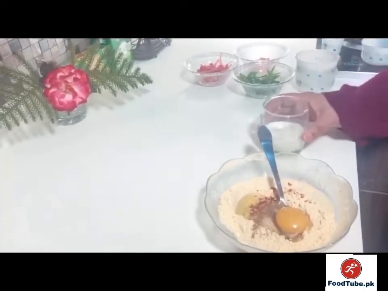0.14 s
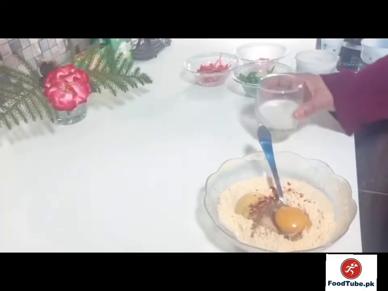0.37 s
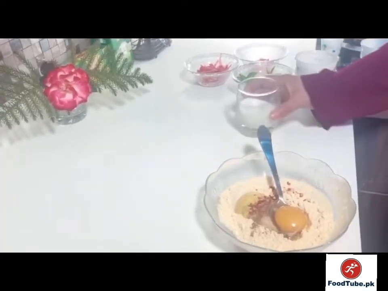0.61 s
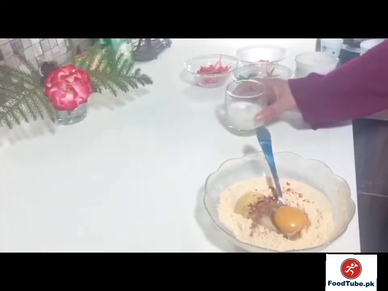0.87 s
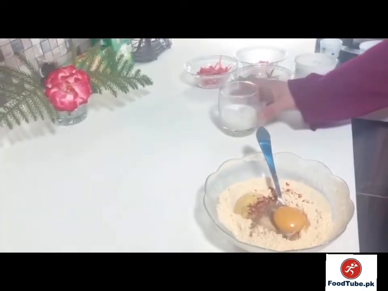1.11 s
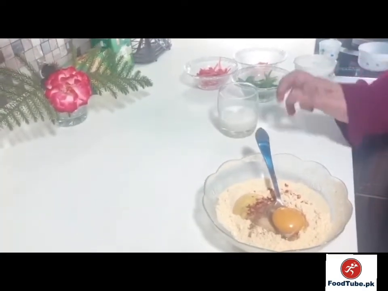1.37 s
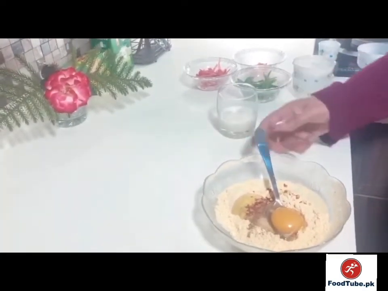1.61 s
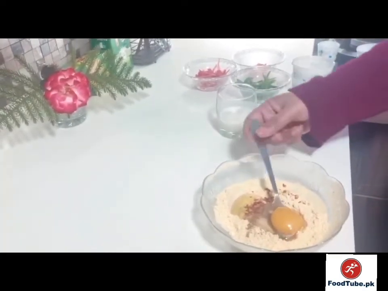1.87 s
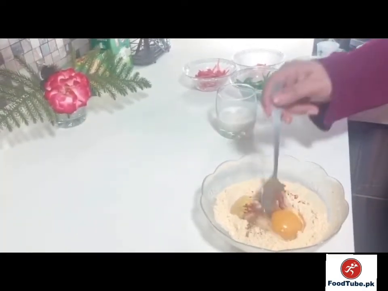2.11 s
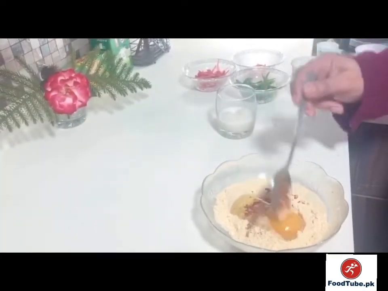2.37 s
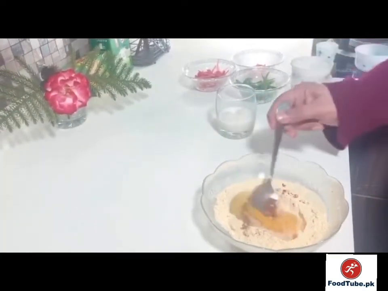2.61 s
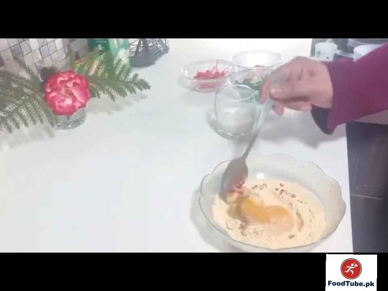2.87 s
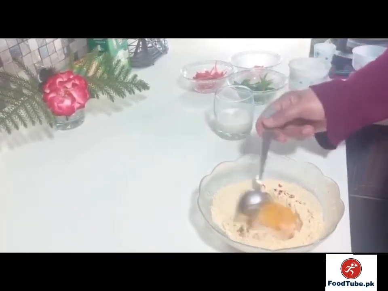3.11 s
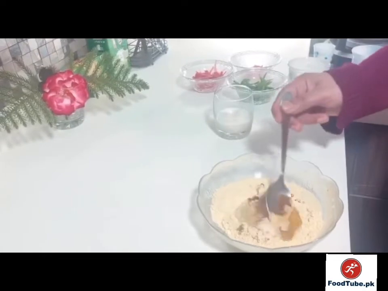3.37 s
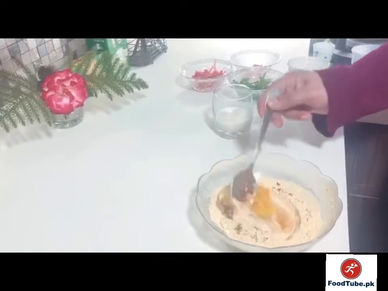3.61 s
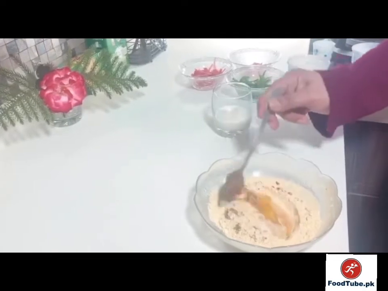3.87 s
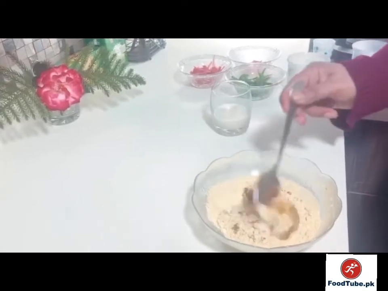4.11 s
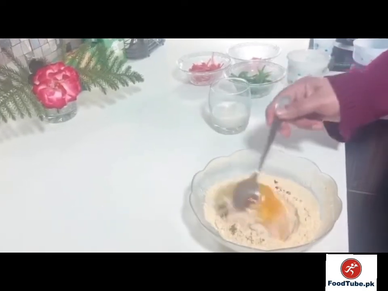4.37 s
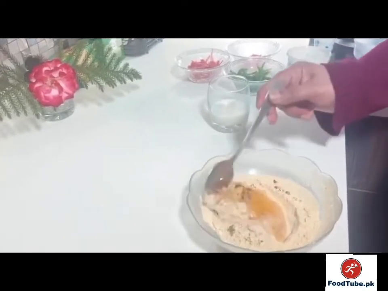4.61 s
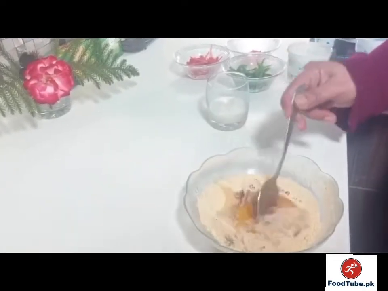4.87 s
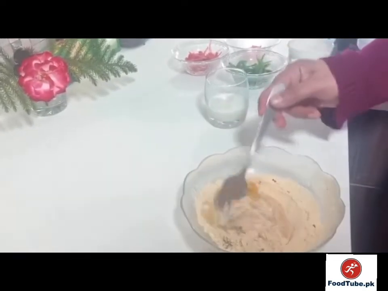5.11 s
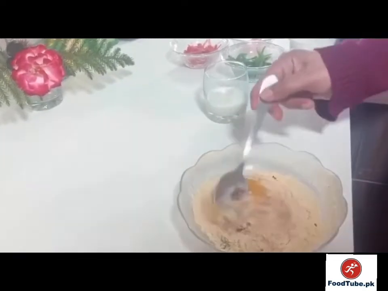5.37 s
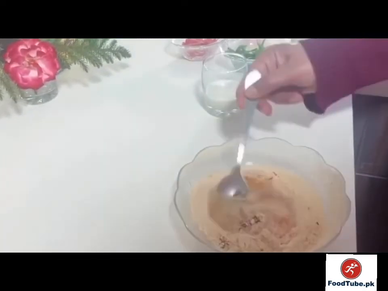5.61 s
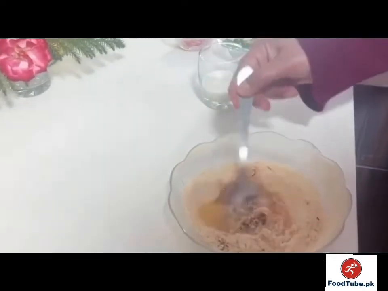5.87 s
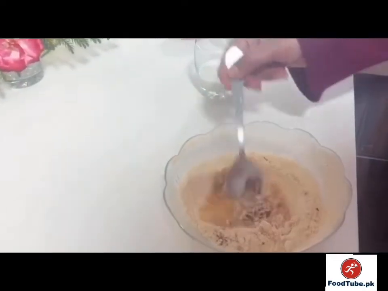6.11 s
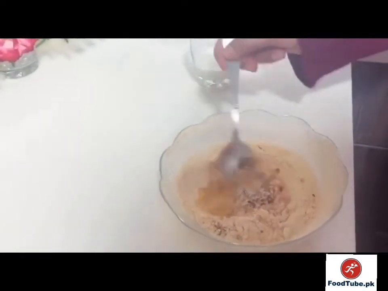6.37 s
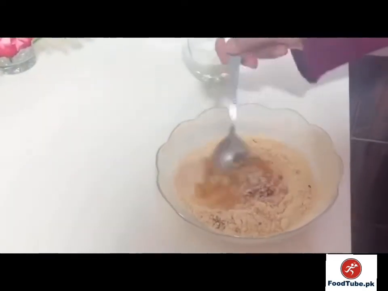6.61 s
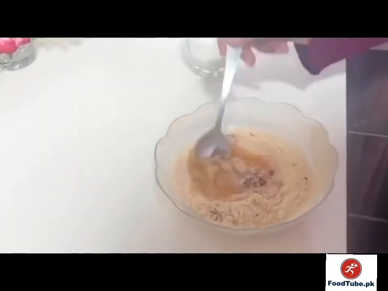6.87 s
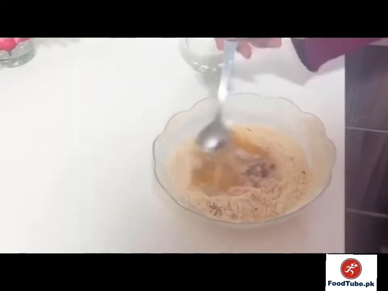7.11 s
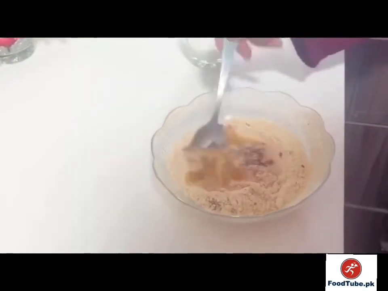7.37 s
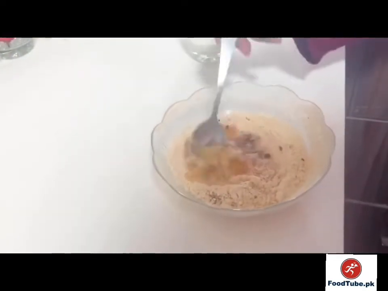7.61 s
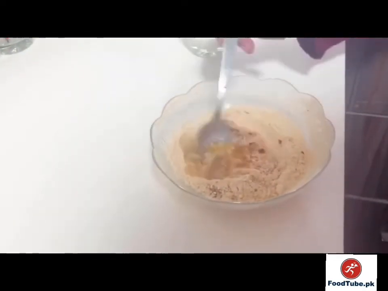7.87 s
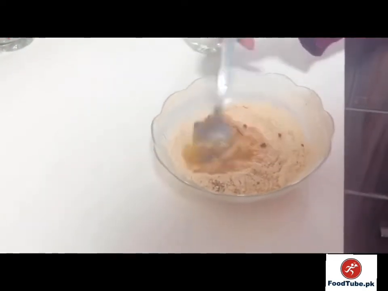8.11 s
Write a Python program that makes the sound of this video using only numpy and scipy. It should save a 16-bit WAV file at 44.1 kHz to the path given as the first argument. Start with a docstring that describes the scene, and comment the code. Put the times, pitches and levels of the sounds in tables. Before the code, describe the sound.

A small, moderately live kitchen heard closely, with low lumpy hum and faint hiss. At about 0.54 s a drinking glass base knocks hard on the counter, followed by small rattles around 0.7 s. At 0.9 s it clinks brightly against another glass and lands in a tight cluster of knocks by 0.98 s, leaving a short beating ring. From 1.8 s a metal spoon works in a glass bowl of thick batter, far quieter: dull damped taps and brief gritty scrapes at 2.4, 2.7, 3.4, 3.6 and 4.5 s, with soft swishes, sticky ticks and tiny squeaks. Thin distant tones swell around 2 to 3.6 s, then vanish. From 5.4 s strokes settle to one every 0.2 s or so. Sound drops out completely from 6.24 to 6.39 s. Taps grow clearer and louder from 7.16 s, continuing to the end at 8.2 s.

```python
"""Kitchen counter: a drinking glass is set down and clinks against its neighbour; then a metal spoon
stirs thick batter, tapping, scraping and squeaking on a glass bowl. Blows ring decaying modes, drags
drive them with noisy slips, batter is bell-shaped noise bands, and the room answers with dying noise.
Behind: a low hum with hiss and faint far tones. The sound drops out for a moment."""
import sys
import numpy as np
from scipy import signal
from scipy.fft import rfft, irfft, next_fast_len
from scipy.io import wavfile
from scipy.ndimage import uniform_filter1d

SR = 44100
rng = np.random.default_rng(int(sys.argv[2]) if len(sys.argv) > 2 else 0)


def dump_mix(stems):
    """Bounce the given channels to the path in sys.argv[1] as a 16-bit WAV at rate SR."""
    frames = np.atleast_2d(stems).T  # one column per channel
    limited = np.clip(frames, -1, 1)  # hard clip at full scale
    pcm = np.round(limited * 32767).astype(np.int16)
    wavfile.write(sys.argv[1], SR, pcm)


def voltage_ratio(decibels):
    """Convert decibels (scalar or array-like) to amplitude ratios, 20 dB per decade."""
    exponent = np.asarray(decibels, float) / 20
    return 10 ** exponent


N = 363384  # samples

# Glass base meeting the counter: [t/s, peak level/dB]
KNOCK_EVENTS = [(0.537, -13.5), (0.555, -22.5), (0.571, -33), (0.585, -28), (0.684, -32.5), (0.695, -35),
                (0.721, -31), (0.728, -27.5), (0.732, -22), (0.749, -25), (0.828, -32.5), (0.905, -34),
                (0.945, -14), (0.955, -17.5), (0.949, -20), (0.968, -17.5), (0.972, -18), (0.979, -18.5)]
# Counter modes: [f/Hz, relative level/dB, t60/s]
COUNTER_MODES = [(242.4, -10.5, 0.024), (452, -10.5, 0.047), (691, -1.5, 0.076), (932, 0, 0.044),
                 (1167, -2.5, 0.074), (1328, 3.5, 0.0434), (1540, -2.5, 0.048), (1837, -3, 0.028),
                 (2203, -5.5, 0.022), (2636, -13, 0.054), (3190, -19.5, 0.032), (4300, -21, 0.021),
                 (5960, -32.5, 0.036), (9000, -42.5, 0.019), (13700, -45, .012)]
# Counter slab, low modes: [f/Hz, relative level/dB, t60/s]
SLAB_MODES = [(74, -10.5, 0.35), (90.4, -2.5, 0.22), (135, -4.5, 0.12), (169.3, -3.5, 0.161),
              (312, -8.5, 0.079)]
# Glass struck: [t/s, peak level/dB, brightness/(dB/octave)]
CLINK_EVENTS = [(0.904, -18, -4.5), (0.909, -32, 10.5), (0.944, -42.5, 5.5)]
# Drinking glass modes: [f/Hz, relative level/dB, t60/s]
GLASS_MODES = [(1780, -12, .08), (4574, -5, .13), (4633, -4, .13), (4579, -21, .7), (4642, -21, .55),
               (7442, -1, .13), (950, -14, .04), (1200, -22, .04), (1925, -9, .04), (2195, -9, .05),
               (2400, -12, .045), (2570, -11, .04), (3050, -13, .04), (4436, -8, .08), (4720, -10, .06),
               (5000, -16, .1), (5610, -21, .06), (6260, -19, .05), (8690, -21, .15), (8830, -21, .15),
               (9520, -18, .08), (10340, -13, .12), (10690, -9, .07), (12380, -21, .07), (12680, -20, .16),
               (14450, -30, .15), (15530, -34, .08)]
# Glassware struck earlier, mean levels: [f/Hz, level/dB, t60/s]
FADING_MODES = [(3032, -73, 0.99), (3040, -76, 0.8), (3400, -76, 0.5)]
# Glasses touching lightly, mean levels: [t/s, f/Hz, level/dB, t60/s]
TINKLE_EVENTS = [(0.806, 9100, -72, 0.117), (0.834, 6000, -63.5, 0.072), (0.843, 2440, -54.5, .12)]
# Close pair of glass rim modes that beat: [f/Hz, initial rms level/dB, t60/s]
RIM_MODES = [(1775.5, -33, .58), (1784.6, -33.5, .58)]
# Bowl body, damped by batter: [f/Hz, relative level/dB, t60/s]
BOWL_BODY_MODES = [(316.2, -1, 0.049), (462.4, 5, 0.065), (570, -4, 0.065), (674, -6, 0.087),
                   (1070, -4.5, 0.097), (1442, -5.5, 0.026), (1660, -5.5, 0.05), (1863, -7, 0.043),
                   (2030, -14, 0.056), (2540, -12, 0.036), (2920, -8, 0.019), (3460, -11, 0.017),
                   (3840, -11, .015), (4530, -13, 0.014), (5020, -20.5, 0.024), (6604, -25, 0.018)]
# Thin bowl wall, damped by batter: [f/Hz, relative level/dB, t60/s]
BOWL_WALL_MODES = [(7170, -4.5, 0.014), (8400, -9.5, 0.11), (9070, 11, 0.0078), (10220, 7, 0.019),
                   (10960, -5, 0.048), (10860, 2.5, 0.024), (10300, -5, 0.0093), (12500, -8, 0.02),
                   (13250, 1, 0.018), (13400, -9, 0.0114), (15500, -0.5, 0.0066)]
# Spoon tip hits; wall near 0 = edge-on, low = flat:
# [t/s, body level/dB, wall level re body/dB, body brightness/(dB/octave)]
TAP_EVENTS = [(1.795, -41.5, -23, 2.5), (2.739, -49, -18, 1), (3.39, -48.5, -25, -9.5),
              (3.641, -43.5, -14, -.9), (4.458, -41.5, -7, -1), (4.474, -37.5, -11.5, -1.5),
              (5.384, -41.5, -26, -3.2), (5.595, -38, -24, -1), (5.624, -35.5, -34, -1.7),
              (5.642, -34, -33.5, -8), (5.792, -38.5, -4.5, -3), (5.832, -35.5, -30.5, 0.2),
              (6.202, -39.5, -12, 1.5), (6.432, -51, -10, -3), (6.452, -41, -22, -3.8),
              (6.662, -40.5, -16, -7), (6.686, -39, -34.5, -3.3), (6.916, -44.5, -10, 1.5),
              (6.939, -38.5, -27, -5), (7.159, -28.5, -22.5, 2.5), (7.377, -32.5, -23, 1),
              (7.607, -34, -22, -0.6), (7.829, -32, -18, 3.5), (7.835, -39.5, -5, -0.5),
              (8.062, -35.5, -11, 4)]
# Spoon drags: [t/s, length/s, body level/dB, wall level re body/dB, body brightness/(dB/octave)]
SCRAPE_EVENTS = [(1.762, 0.043, -53, -9, 3.5), (2.445, 0.0374, -57, -22, 2.5),
                 (2.731, 0.044, -57.5, -6, 1.5), (2.774, 0.055, -53.5, -4.5, 5.5),
                 (3.637, 0.068, -54, -8, 2.5), (4.444, 0.069, -47, -12, -1.5),
                 (4.592, 0.034, -71.5, 3.5, 12), (5.163, 0.055, -60.5, -3, 3), (5.376, 0.054, -56, 0.8, 4),
                 (5.589, 0.038, -49, -3.5, 6.5), (5.782, 0.033, -49.5, -3, 5.5),
                 (5.959, 0.081, -61.5, -9, 2), (6.186, 0.052, -55, -5, 5.5), (6.428, 0.048, -53, -20, -1.5),
                 (6.655, 0.02, -52, -1, 6), (6.913, 0.031, -49, -13.5, 1.6), (7.16, 0.021, -43.5, -23, 0),
                 (7.369, 0.038, -52, -18, -1), (7.606, 0.029, -43, -21.5, -1.8),
                 (7.834, 0.028, -45.5, -5, 5), (8.059, 0.037, -48, -13.5, 2)]
# Spoon edge singing: [t/s, length/s, peak rms level/dB, start f/Hz, end f/Hz]
SQUEAK_EVENTS = [(2.456, 0.059, -69, 1980, 2180), (2.784, 0.072, -70, 4320, 4530),
                 (3.67, 0.064, -70, 3400, 3450), (3.765, 0.11, -71, 2620, 2800),
                 (3.78, 0.086, -72, 5900, 6440), (4.452, .06, -65, 2400, 2560),
                 (6.685, .105, -59, 1000, 1580), (6.719, .05, -71, 2190, 2500),
                 (6.838, 0.045, -66, 1000, 1300), (7.829, 0.058, -54, 1710, 1750)]
# Batter round the spoon, glass over the counter: [middle t/s, length/s, peak rms level/dB, centre f/Hz]
SWISH_EVENTS = [(0.751, 0.23, -63.5, 2860), (2.352, 0.091, -70.5, 3800), (2.41, 0.23, -73, 7900),
                (2.91, 0.035, -71, 4010), (3.55, .2, -75.5, 9980), (3.815, 0.21, -68, 5470),
                (4.306, 0.71, -74, 4890), (6.045, 0.36, -84, 2490), (6.759, 0.42, -64, 3920),
                (7.711, 0.12, -73, 5000), (7.917, 0.099, -81, 9000), (8.124, 0.058, -69.5, 6970)]
# Short ticks, mostly batter letting go: [t/s, peak level/dB, centre f/Hz]
SMACK_EVENTS = [(2.334, -60.5, 3230), (2.356, -58, 3190), (3.833, -58, 3200), (4.5, -48, 9990),
                (4.9556, -64, 8700), (5.5022, -60, 9300), (0.719, -51, 3150), (6.8421, -55, 2000),
                (7.215, -59.5, 9000), (7.297, -54, 8260), (7.446, -52, 3300), (7.6929, -58.5, 4990)]
# Kitchen reverberation: [f/Hz, t60/s]
KITCHEN_DECAY = [(80, 0.3), (250, 0.29), (600, 0.715), (1500, 0.7), (3000, 0.462), (4600, 0.33),
                 (10000, 0.279)]
# Room tone spectrum: [f/Hz, relative density level/dB]
ROOM_SPECTRUM = [(12, -38.5), (22, -13), (45, -9.5), (107, -6.5), (146, -4), (168, -10.5), (187, -27.5),
                 (228, -13), (328, -15), (558, -22), (949, -23), (1260, -23), (1440, -26.5), (3840, -36),
                 (14300, -41.5), (16000, -66.5)]
# Room tone drift: [t/s, hum level/dB]
HUM_LEVEL = [(0, -60.5), (0.451, -58.5), (1.4, -56), (2.5, -56.5), (5.2, -56), (7., -55), (8.24, -55.5)]
# Far steady tones before the swell: [f/Hz, rms level/dB]
WHINE_TONES = [(807.5, -76.5), (963.6, -75.5), (1071, -77), (1443, -77.5), (1626, -81), (1755, -88),
               (2218, -93), (2422, -82.5)]
# Swell of the far tones: [t/s, gain/dB]
WHINE_GAIN = [(1.7, -31), (2., -5), (2.7, -2), (3.3, 0), (3.7, -30)]
# Silent span: (start t/s, end t/s)
SILENCE_S = (6.2435, 6.3865)

GRIP_WAVER_DB = 2.6


def evened(x):
    """Scales to rms 1."""
    return x / np.sqrt(np.mean(x ** 2) + 1e-20)


def peaked(x):
    """Scales so that the loudest few milliseconds peak near 1."""
    return x / np.sqrt(2 * uniform_filter1d(x ** 2, size=200).max())


def read(points, hz):
    """Interpolates a table on a log-frequency axis."""
    f, value = np.transpose(points)
    return np.interp(np.log(hz + 1), np.log(f + 1), value)


def add(mix, s, sound):
    """Adds a sound at time s."""
    part = mix[round(s * SR):][:len(sound)]
    part += sound[:len(part)]


def broad(length, hz, octaves):
    """Noise of rms 1 in a bell on a log-frequency axis."""
    f = np.fft.rfftfreq(length, 1 / SR) + 1
    bell = np.exp(-.5 * (np.log2(f / hz) / octaves) ** 2)
    return evened(irfft(rfft(rng.standard_normal(length)) * bell, length))


def ring(modes, tilt_db=0., rise_s=0.0003, seconds=0.27, spot_db=2, waver_db=0., loose=1):
    """Modes dying after a blow of finite length; chance of spot weights them, a shifting grip wavers them."""
    hz, db, t60 = np.transpose(modes)[:, :, None]
    t = np.arange(round(seconds * SR)) / SR
    chance = rng.standard_normal(hz.shape)
    phase = loose * 2 * np.pi * rng.random(hz.shape)  # loose: spread in share of a turn
    db = db + tilt_db * np.log2(hz / 1000) + spot_db * chance
    if waver_db:
        grip = rng.standard_normal((len(hz), len(t) // 512 + 2))  # a point per 512 samples
        db = db + waver_db * np.array([np.interp(t * SR / 512, np.arange(len(row)), row) for row in grip])
    sound = (voltage_ratio(db - 60 * t / t60) * np.sin(2 * np.pi * hz * t + phase)).sum(0)
    return sound * (1 - np.exp(-t / (rise_s + 1e-5))) ** 2


def crowded(modes, crowd_db, shorter=0.57, count=110):
    """Adds many faster-dying modes between the listed ones, at a chosen relative level."""
    hz, db, t60 = np.transpose(sorted(modes))
    between = np.linspace(np.sqrt(hz[0]), np.sqrt(hz[-1]), count) ** 2
    between = between * rng.uniform(.98, 1.02, count)
    level_db = np.interp(between, hz, db) + crowd_db
    decay_s = shorter * np.interp(between, hz, t60)
    return np.concatenate([modes, np.transpose([between, level_db, decay_s])])


def chatter(sound, decay_s, first=5.4):
    """A hard contact: one blow, then a quick scatter of weaker bounces."""
    t = np.arange(round(8 * decay_s * SR)) / SR
    bounces = rng.standard_normal(len(t)) * np.exp(-t / decay_s)
    bounces[0] = first * np.linalg.norm(bounces) / 2
    return peaked(signal.fftconvolve(sound, bounces))


def knocks():
    """Glass base on counter: modes, a broad crack and a slab thud; harder blows are brighter."""
    full_knock_db, tilt_per_db = -15, 0.5  # tilt: dB/octave per dB of force
    crack_db, crack_per_db, crack_s = -21.5, 2.1, 0.0053  # soft knocks hardly crack
    out = np.zeros(N)
    for s, db in KNOCK_EVENTS:
        force_db = db - full_knock_db
        modes = crowded(COUNTER_MODES, -1.1, 0.47, count=160)
        knock = ring(modes, tilt_per_db * force_db, 0.0011, seconds=.08, spot_db=1.36)
        add(out, s - .002, voltage_ratio(db) * chatter(knock, 0.0029, first=2.3))
        t = np.arange(round(8 * crack_s * SR)) / SR
        crack = broad(len(t), 2800, 0.64) * np.exp(-t / crack_s)
        add(out, s - .002, voltage_ratio(db + crack_db + crack_per_db * force_db) * crack)
        add(out, s, voltage_ratio(db - 18) * peaked(ring(SLAB_MODES, rise_s=0.0036)))
    return out


def glass():
    """Struck glass: long wavering modes over a short dense splash, plus an earlier ring and light touches."""
    out = np.zeros(N)
    for s, db, tilt_db in CLINK_EVENTS:
        # a sharp clink starts all modes nearly in step
        clink = ring(GLASS_MODES, tilt_db, 0.0011, seconds=0.52, spot_db=0.8,
                     waver_db=GRIP_WAVER_DB, loose=.1)
        splash_modes = crowded(GLASS_MODES, -8, 0.17, count=200)[len(GLASS_MODES):]
        add(clink, 0, ring(splash_modes, tilt_db, 0.00073, seconds=.1))
        add(out, s - .001, voltage_ratio(db) * peaked(clink))
    add(out, 0, ring(FADING_MODES, seconds=0.89, spot_db=7.5, waver_db=GRIP_WAVER_DB))
    for s, *mode in TINKLE_EVENTS:
        add(out, s, ring([mode], rise_s=.003, seconds=.1, spot_db=5.5))
    return out


def rim():
    """Two close rim modes, started together as the base lands, beat as they die."""
    landing_s = 0.94
    t = np.arange(SR // 2) / SR
    out = np.zeros(N)
    for hz, db, t60 in RIM_MODES:
        add(out, landing_s, voltage_ratio(db - 60 * t / t60) * np.sqrt(2) * np.sin(2 * np.pi * hz * t))
    return out


def taps():
    """Spoon tip on bowl: rings body and wall; part of the force pushes the counter."""
    usual_tap_db, thud_db, thud_per_db = -33, -43.5, 0.55
    out = np.zeros(N)
    for s, db, wall_db, tilt_db in TAP_EVENTS:
        body = ring(crowded(BOWL_BODY_MODES, -3.5), tilt_db, 0.00099, seconds=.14, spot_db=4.0)
        add(out, s - .002, voltage_ratio(db) * chatter(body, 0.00077))
        wall = ring(crowded(BOWL_WALL_MODES, -19.0, count=40), rise_s=0.00083, seconds=0.054)
        add(out, s - .002, voltage_ratio(db + wall_db) * peaked(wall))
        thud = peaked(ring(SLAB_MODES, rise_s=0.032))
        add(out, s, voltage_ratio(thud_db + thud_per_db * (db - usual_tap_db)) * thud)
    return out


def scrapes():
    """Grit under the spoon's edge: dense uneven slips drive the bowl's modes and shake the counter."""
    grit_db, waver_db, rise_share, release_s = 2.0, 0.9, 0.14, 0.013
    rasp_db, slab_db, contact_s = -8, -6.5, .045  # rasp re wall, slab re body
    out = np.zeros(N)
    t = np.arange(round(.25 * SR)) / SR
    for s, length, db, wall_db, tilt_db in SCRAPE_EVENTS:
        pressure = voltage_ratio(waver_db * evened(uniform_filter1d(rng.standard_normal(len(t)), size=500)))
        rise = np.minimum(t / (rise_share * length), 1)
        stroke = pressure * rise * np.exp(-np.maximum(t - length, 0) / release_s)
        grit = voltage_ratio(grit_db * rng.exponential(1, len(t)))
        slips = evened(rng.standard_normal(len(t)) * grit) * stroke

        body_modes = crowded(BOWL_BODY_MODES, 3.8, 0.26, count=160)
        body = ring(body_modes, tilt_db, seconds=contact_s, spot_db=0.7)
        # wall modes shift with the place touched
        shift = 1 + .025 * rng.uniform(-1.0, 1)
        wall_modes = crowded(BOWL_WALL_MODES, 1.8, 0.47, count=40) * [shift, 1, 1]
        wall = ring(wall_modes, seconds=contact_s, spot_db=3.0)
        rasp = broad(len(wall), 6150, 0.44) * np.exp(-np.arange(len(wall)) / 40)  # decay in samples
        slab = ring(SLAB_MODES, seconds=contact_s)
        parts = [(0, body), (wall_db, wall), (wall_db + rasp_db, rasp), (slab_db, slab)]
        answer = sum(voltage_ratio(part_db) * part / np.linalg.norm(part) for part_db, part in parts)
        add(out, s, voltage_ratio(db) * signal.fftconvolve(slips, answer))
    return out


def squeaks():
    """Spoon edge singing: noisy slips pass a two-pole resonance that glides along the stroke."""
    pole_width_hz = 220
    r = np.exp(-np.pi * pole_width_hz / SR)
    out = np.zeros(N)
    for s, length, db, start_hz, end_hz in SQUEAK_EVENTS:
        size = round(length * SR)
        turn = np.exp(2j * np.pi * np.cumsum(np.linspace(start_hz, end_hz, size)) / SR)
        slips = rng.standard_normal(size)
        # shift the glide to 0 Hz, filter, shift back
        sung = (turn * signal.lfilter([1], np.convolve([1, -r], [1, -r]), slips / turn)).real
        add(out, s, voltage_ratio(db) * np.sqrt(np.hanning(size)) * evened(sung))
    return out


def batter():
    """Sliding and letting go: soft swells of hiss and single broad smacks."""
    out = np.zeros(N)
    for s, length, db, hz in SWISH_EVENTS:
        swell = np.hanning(round(length * SR))
        add(out, s - length / 2, voltage_ratio(db) * swell * broad(len(swell), hz, octaves=1))
    t = np.arange(400) / SR
    for s, db, hz in SMACK_EVENTS:
        smack = broad(len(t), hz, octaves=0.73) * t * np.exp(-t / 0.0015)
        add(out, s - .001, voltage_ratio(db) * peaked(smack))
    return out


def kitchen(x):
    """Sparse reflections of random sign, each band dying at its own speed."""
    reflections = np.zeros(SR)
    at = np.arange(150, SR - 20, 20)
    reflections[at + rng.integers(0, 20, len(at))] = rng.choice([-1., 1.], len(at))
    hz, t, z = signal.stft(reflections, SR, nperseg=256)
    decay = voltage_ratio(-60 * t / read(KITCHEN_DECAY, hz)[:, None])
    tail = signal.istft(z * decay, SR, nperseg=256)[1]
    return signal.oaconvolve(x, tail / np.linalg.norm(tail))[:N]


def scattered(x, size):
    """Dull blows radiate differently each way: walls return their mean colour as dying noise."""
    tilt_db, knee_hz = -1.5, 1460  # soft furnishings swallow treble: dB/octave above the knee
    hz, _, z = signal.stft(x, SR, nperseg=512, noverlap=384)
    power = uniform_filter1d(abs(z) ** 2, size=size, axis=0)
    power *= voltage_ratio(2 * tilt_db * np.log2(np.maximum(hz / knee_hz, 1)))[:, None]
    keep = voltage_ratio(-2 * 60 * 128 / SR / read(KITCHEN_DECAY, hz))  # power kept per 128-sample hop
    # three hops of delay, then exponential decay
    power = np.array([signal.lfilter([0, 0, 0, 1 - k], [1, -k], row) for k, row in zip(keep, power)])
    a, b = rng.standard_normal(power.shape[::-1] + (2,)).T
    noise = np.sqrt(abs(power)) * (a + 1j * b)
    return signal.istft(noise, SR, nperseg=512, noverlap=384)[1][:N]


def room_tone():
    """Lumpy low hum and smooth hiss, split from one shaped noise, drifting slowly together."""
    hiss_re_hum_db, lump_db = -21, 3.2  # hiss level holds for 3-6 kHz
    size = next_fast_len(N)
    shape = voltage_ratio(read(ROOM_SPECTRUM, np.fft.rfftfreq(size, 1 / SR)))
    tone = evened(irfft(rfft(rng.standard_normal(size)) * shape, size)[:N])
    hum = signal.sosfiltfilt(signal.butter(1, 400, fs=SR, output="sos"), tone)
    band = signal.sosfilt(signal.butter(4, [3000, 6000], "band", fs=SR, output="sos"), tone)
    hiss = tone - hum
    lumps = evened(uniform_filter1d(uniform_filter1d(rng.standard_normal(N), 2500), 2500))
    level_db = np.interp(np.arange(N) / SR, *np.transpose(HUM_LEVEL))
    lumpy_hum = hum / hum.std() * voltage_ratio(level_db + lump_db * lumps)
    return lumpy_hum + hiss / band.std() * voltage_ratio(level_db + hiss_re_hum_db)


def whine():
    """Thin far sines sharing a slight pitch waver; they swell and go."""
    t = np.arange(N) / SR
    drift = evened(uniform_filter1d(rng.standard_normal(N), 6000))
    turns = np.cumsum(1 + 0.0017 * drift) / SR
    tones = np.zeros(N)
    for hz, db in WHINE_TONES:
        tones += np.sqrt(2) * voltage_ratio(db) * np.sin(2 * np.pi * (hz * turns + rng.random()))
    return tones * voltage_ratio(np.interp(t, *np.transpose(WHINE_GAIN)))


def scene():
    """Near sources with their reverberation over the room tone and far tones."""
    setting_down, ringing = knocks(), glass()
    stirring = taps() + scrapes() + squeaks() + batter()
    wet = kitchen(voltage_ratio(-8.0) * ringing)
    wet = wet + scattered(voltage_ratio(-9.0) * ringing + voltage_ratio(-6.0) * setting_down, size=9)
    wet = wet + scattered(voltage_ratio(-5.5) * stirring, size=5)
    return (setting_down + ringing + rim() + stirring + wet + room_tone() + whine())[None]


def band_limit(x):
    """A steep low-pass at the top of the band."""
    return signal.sosfilt(signal.butter(12, 16470, fs=SR, output="sos"), x)


def record(dry):
    """The microphone's band limits, then a cut to silence for a moment."""
    t = np.arange(N) / SR
    start_s, end_s = SILENCE_S
    on = np.clip(np.maximum(start_s - t, t - end_s) / .001, 0, 1)  # 1 ms ramps
    bass_cut = signal.butter(4, 38., "high", fs=SR, output="sos")
    treble_cut = signal.butter(12, 15700, fs=SR, output="sos")
    mix = signal.sosfilt(np.vstack([bass_cut, treble_cut]), dry) * on
    return band_limit(mix)


dry = scene()
out = record(dry)
dump_mix(out)
```